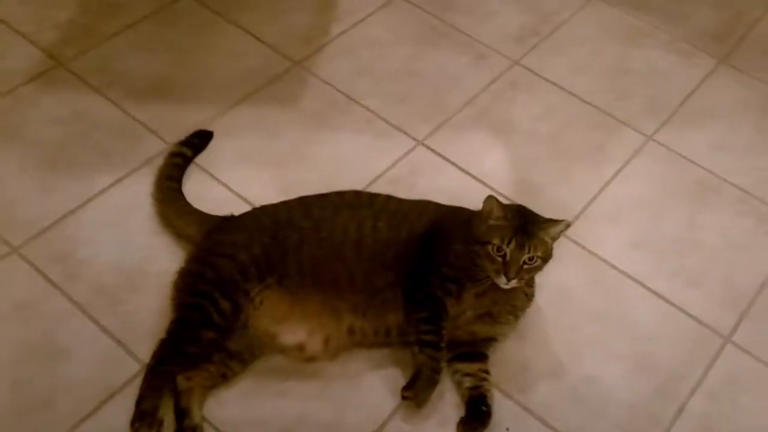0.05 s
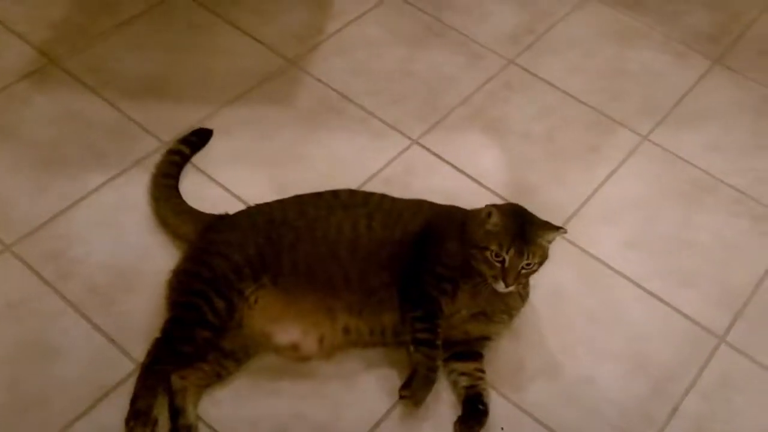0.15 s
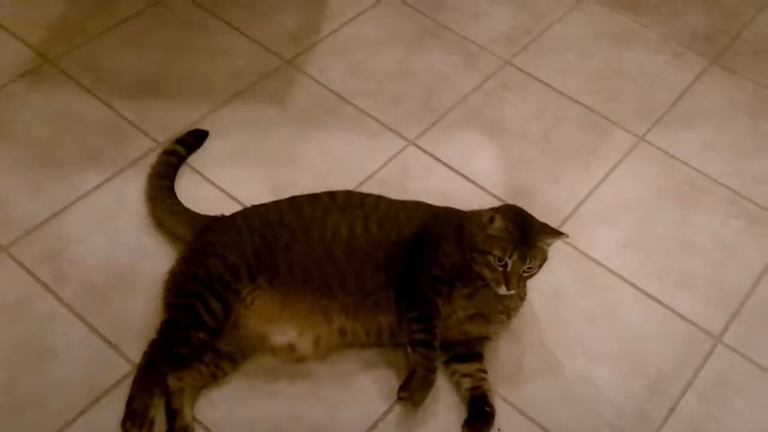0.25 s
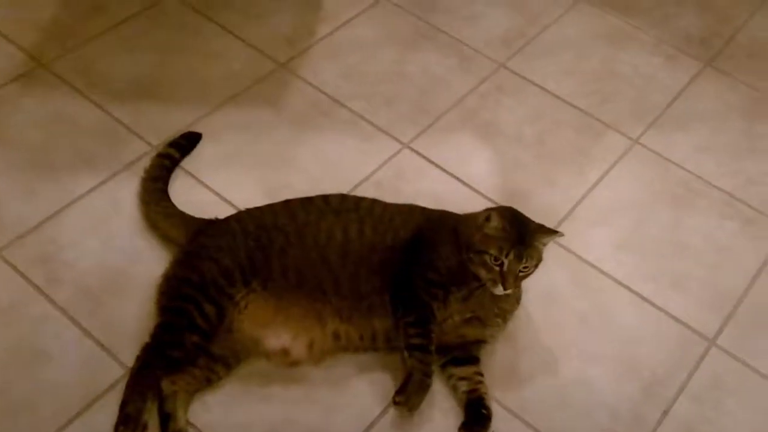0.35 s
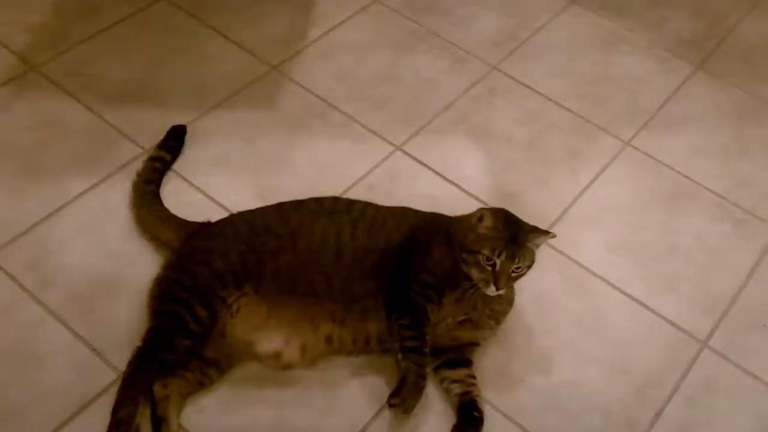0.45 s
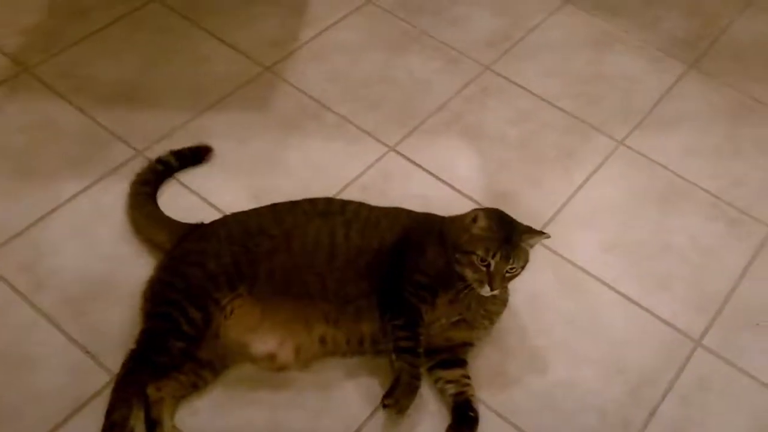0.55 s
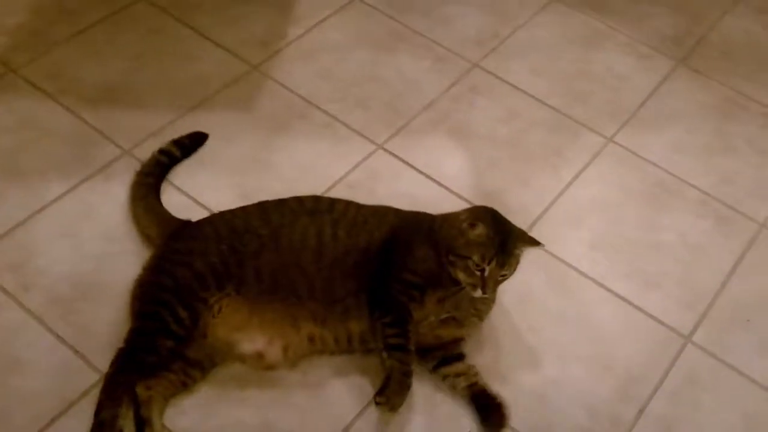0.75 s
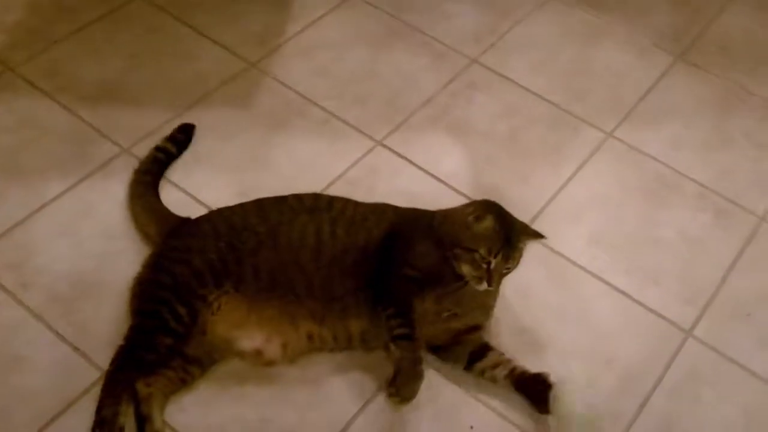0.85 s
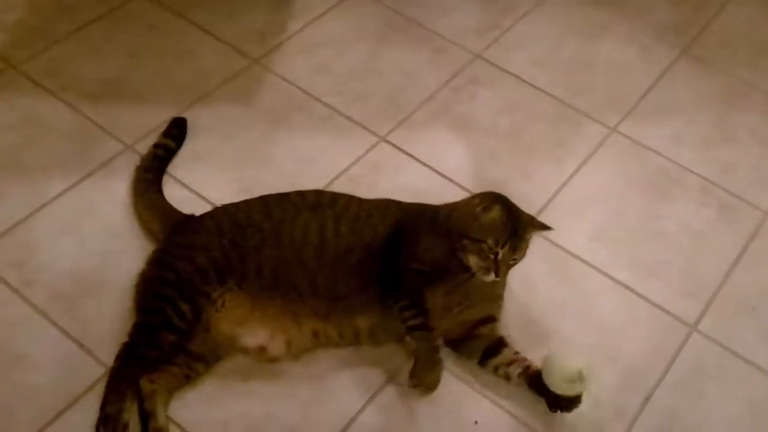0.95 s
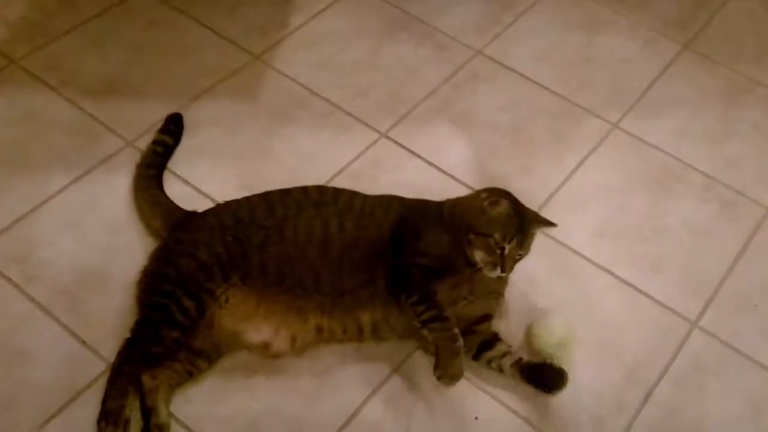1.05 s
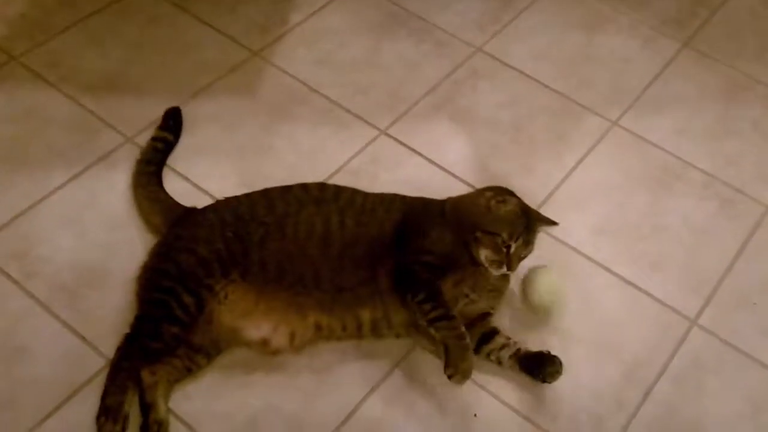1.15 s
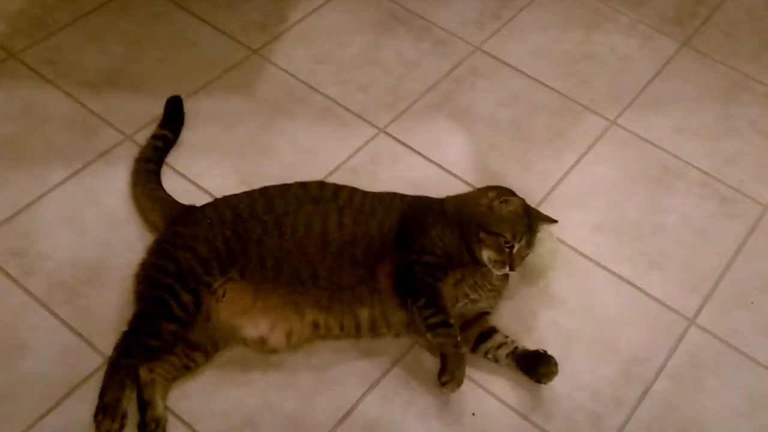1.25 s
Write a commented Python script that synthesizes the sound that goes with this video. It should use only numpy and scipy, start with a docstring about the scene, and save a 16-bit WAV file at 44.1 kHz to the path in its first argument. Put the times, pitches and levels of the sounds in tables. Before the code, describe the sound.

A soft ball drops on a tile floor with a dull thump, then lands again more lightly as a cat's paw taps it. One fainter tap follows. The small room booms briefly over a low appliance hum and microphone hiss.

```python
"""An appliance hums over low room tone, with a camera's hiss and faint high buzz.
A soft, felt-covered ball drops on a tiled floor: its compression radiates a dull thump, its shell
rings and its felt scuffs. It lands again more lightly, and a cat's paw brushes and taps it twice.
After each bounce a small room booms briefly with reflections and standing waves."""
import sys
import numpy as np
from scipy import signal
from scipy.fft import rfft, irfft
from scipy.io import wavfile

SR = 44100
rng = np.random.default_rng(int(sys.argv[2]) if len(sys.argv) > 2 else 0)


def materialize(psi):
    """Save the field psi as 16-bit PCM at rate SR to the path in sys.argv[1].

    A 1-D psi becomes a single channel; in a 2-D psi each row is a channel.
    """
    bounded = np.clip(np.atleast_2d(psi).T, -1, 1)
    quanta = np.round(bounded * 32767).astype(np.int16)
    wavfile.write(sys.argv[1], SR, quanta)


N = 57330
T = np.arange(N) / SR

# steady tones of appliance and camera (frequency [Hz], rms level [dB])
HUM_TONES = [(102.3, -69.5), (220.7, -69.5), (458.2, -60), (603, -79), (4441, -92), (5454, -85.5),
             (6050, -99), (11569, -101)]
# spectrum of the room tone (frequency [Hz], relative level [dB])
RUMBLE_SPECTRUM = [(20, 1.5), (35, -4.5), (60, 3), (105, 0), (150, -3), (225, -3), (310, -9), (520, -11.5),
                   (700, -15.5), (1100, -18.5), (2200, -25), (5000, -57)]
# spectrum of the camera's hiss (frequency [Hz], relative level [dB])
HISS_SPECTRUM = [(500, 3.5), (2200, -8), (3300, 1.5), (4700, 2), (5700, -7.5), (6500, -8.5), (9000, -10),
                 (10500, -8.5), (12000, -6.5), (15000, -7.5)]
# landings of the ball (time [s], thump level [dB], contact duration [s], scuff level [dB])
BOUNCES = [(0.24, -21, 0.006455, -49), (0.7606, -35, 0.00628, -54)]
# modes of the ball's shell (frequency [Hz], level relative to the thump [dB], T60 [s])
SHELL_MODES = [(350, -21, 0.023), (573, -11.5, 0.029), (731, -16.5, 0.028), (2020, -51, 0.017)]
# spectrum of felt rubbing on tile (frequency [Hz], relative level [dB])
SCUFF_SPECTRUM = [(300, -19), (700, 8), (1200, 3), (2000, -12), (4300, -7), (5500, -21.5), (9000, -35),
                  (15000, -20)]
# early reflections (delay [s], level [dB])
REFLECTIONS = [(0.01, -14.5), (0.0167, -17.5)]
# standing waves of the room (frequency [Hz], level [dB], T60 [s])
ROOM_MODES = [(101.2, -58, 0.42), (120, -54, 0.17), (194.7, -71, 0.7), (253.3, -65.5, 0.41)]
# spectrum of the diffuse tail (frequency [Hz], relative level [dB])
TAIL_SPECTRUM = [(50, 5), (110, 0.5), (220, -1.5), (330, 1), (450, 1.5), (750, 2), (1400, -1), (4500, -2),
                 (12000, -5.5)]
# touches of paw and claws
# (time [s], tick level [dB], knock level [dB], brush level [dB], brush duration [s], tilt [dB/octave])
PAW_TAPS = [(0.7643, -41.5, -40, -44, 0.0017, -0.5), (1.1243, -55.5, -54.5, -64.5, 0.014, 8)]
# spectrum of tick and brush before the tilt (frequency [Hz], relative level [dB])
PAW_SPECTRUM = [(800, 8), (2000, -8), (2900, 1.5), (4800, -1.5), (5500, -24), (7000, -14.5), (9000, -38),
                (15000, -33)]
# modes excited by a tap (frequency [Hz], relative level [dB], T60 [s])
KNOCK_MODES = [(420, -3.5, 0.034), (875, -9, 0.034), (1050, -2.5, 0.024)]
# stop bands of the camera (centre frequency [Hz], bandwidth [Hz])
NOTCHES = [(2730, 490), (5380, 360), (7850, 1620), (10950, 680)]

RUMBLE_DB, HISS_DB = -58, -72
BUZZ_RATE_HZ, BUZZ_START_S = 59.95, .0069
BUZZ_DB, BUZZ_PITCH_HZ, BUZZ_HALF_WIDTH_S = -60, 7320, 0.00019
CONTACT_POWER, CONTACT_SKEW = 2.855, 0.916  # a skew under 1 lands harder than it lets go
SKIN_CUTOFF_HZ = 2530  # the soft skin dulls the thump above this
REFLECTION_CUTOFF_HZ = 1850  # furniture scatters the treble above this
TAIL_DB, TAIL_T60_S, TAIL_DELAY_S, TAIL_RISE_S = -9, 0.51, 0.0017, 0.0033
TICK_T60_S = .012
CAMERA_CUTOFF_HZ = 15400


def undb(db):
    """Amplitude ratio of a level in decibels."""
    return 10 ** (np.asarray(db) / 20)


def noise(spectrum, envelope=1):
    """Spectral shaping: enveloped white noise passes a filter of unit mean power gain."""
    white = envelope * rng.standard_normal(N)
    hz, db = np.array(spectrum).T
    bin_hz = np.maximum(np.arange(N // 2 + 1) * SR / N, 1)
    gain = undb(np.interp(np.log(bin_hz), np.log(hz), db))
    return irfft(rfft(white) * gain / np.sqrt(np.mean(gain ** 2)), N)


def decay(t, t60):
    """Exponential damping from t = 0, by 60 dB in t60 seconds; silent before."""
    return (t >= 0) * np.exp(-np.log(1000) * np.maximum(t, 0) / t60)


def ring(t, modes):
    """Free vibration: a sum of damped modes struck at t = 0."""
    return sum(undb(db) * np.sin(2 * np.pi * hz * t) * decay(t, t60) for hz, db, t60 in modes)


def contact(start, duration, skew=1):
    """Elastic contact: loading and release follow half a sine wave."""
    progress = np.clip((T - start) / duration, 0, 1)
    return np.maximum(np.sin(np.pi * progress ** skew), 0)


def background():
    """Superposition: steady tones of appliance and camera add to broadband room tone and hiss."""
    hum = sum(undb(db) * np.sqrt(2) * np.sin(2 * np.pi * (hz * T + rng.random())) for hz, db in HUM_TONES)
    return hum + undb(RUMBLE_DB) * noise(RUMBLE_SPECTRUM) + undb(HISS_DB) * noise(HISS_SPECTRUM)


def camera_buzz():
    """A periodic pulse train: one high electrical tick per picture scan fuses into a buzz."""
    scans = (T - BUZZ_START_S) * BUZZ_RATE_HZ
    from_tick = ((scans + .5) % 1 - .5) / BUZZ_RATE_HZ  # seconds from the nearest tick
    envelope = np.exp(-(from_tick / BUZZ_HALF_WIDTH_S) ** 2)
    return undb(BUZZ_DB) * envelope * np.sin(2 * np.pi * BUZZ_PITCH_HZ * from_tick)


def ball():
    """Impact radiation: the squashing ball drives a pulse of air; its shell rings and its felt rubs."""
    out = np.zeros(N)
    skin = signal.butter(2, SKIN_CUTOFF_HZ, fs=SR, output="sos")
    for start, thump_db, duration, scuff_db in BOUNCES:
        squash = contact(start, duration, CONTACT_SKEW)
        # radiated pressure follows the acceleration of the displaced air
        acceleration = np.gradient(np.gradient(squash ** CONTACT_POWER))
        pulse = signal.sosfilt(skin, acceleration)
        shell = signal.sosfilt(skin, ring(T - start, SHELL_MODES))
        thump = pulse / np.abs(pulse).max() - shell
        scuff = np.sqrt(squash) * noise(SCUFF_SPECTRUM)
        out += undb(thump_db) * thump + undb(scuff_db) * scuff
    return out


def room(direct):
    """Reverberation: dull early reflections, standing waves and a diffuse tail join the direct sound."""
    rise = np.clip((T - TAIL_DELAY_S) / TAIL_RISE_S, 0, 1)
    tail = noise(TAIL_SPECTRUM) * decay(T, TAIL_T60_S) * rise
    response = undb(TAIL_DB) * tail / np.sqrt(np.sum(tail ** 2)) + ring(T, ROOM_MODES)
    dull = signal.sosfilt(signal.butter(1, REFLECTION_CUTOFF_HZ, fs=SR, output="sos"), direct)
    early = sum(undb(db) * np.interp(T - delay, T, dull) for delay, db in REFLECTIONS)
    return direct + early + signal.fftconvolve(direct, response)[:N]


def paw():
    """Friction, then impact: a short brushing ends in a claw tick and a small ringing knock."""
    out = np.zeros(N)
    for start, tick_db, knock_db, brush_db, duration, tilt in PAW_TAPS:
        tick = undb(tick_db) * decay(T - start, TICK_T60_S)
        brush = undb(brush_db) * contact(start - duration, duration)
        knock = undb(knock_db) * ring(T - start, KNOCK_MODES)
        spectrum = [(hz, db + tilt * np.log2(hz)) for hz, db in PAW_SPECTRUM]
        out += noise(spectrum, envelope=tick + brush) + knock
    return out


def scene():
    """Superposition: ball and paw excite the room over the steady background and buzz."""
    return (room(ball() + paw()) + background() + camera_buzz())[None]


def record(dry):
    """Band-stop and low-pass filtering: the camera rejects four bands and the highest treble."""
    for hz, bandwidth in NOTCHES:
        dry = signal.lfilter(*signal.iirnotch(hz, hz / bandwidth, fs=SR), dry)
    return signal.sosfilt(signal.ellip(10, .2, 70, CAMERA_CUTOFF_HZ, fs=SR, output="sos"), dry)


dry = scene()
out = record(dry)
materialize(out)
```